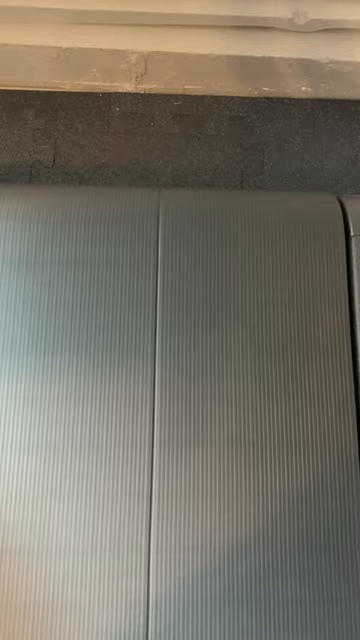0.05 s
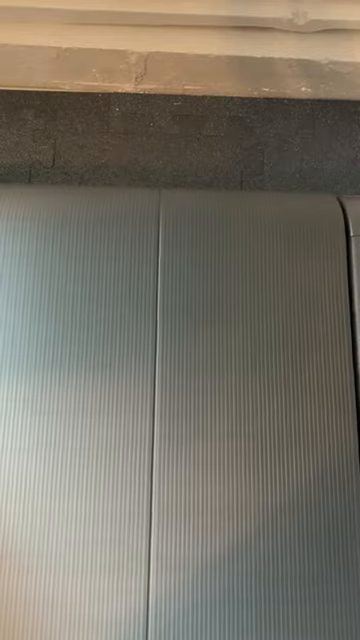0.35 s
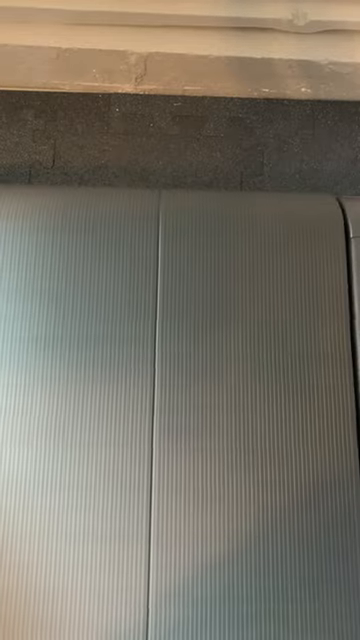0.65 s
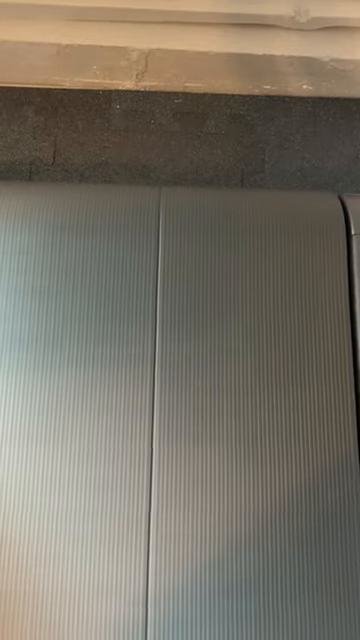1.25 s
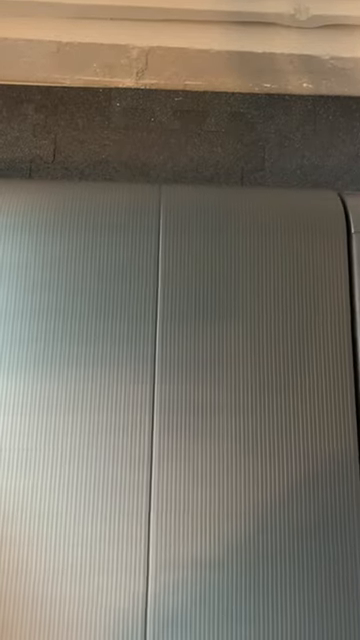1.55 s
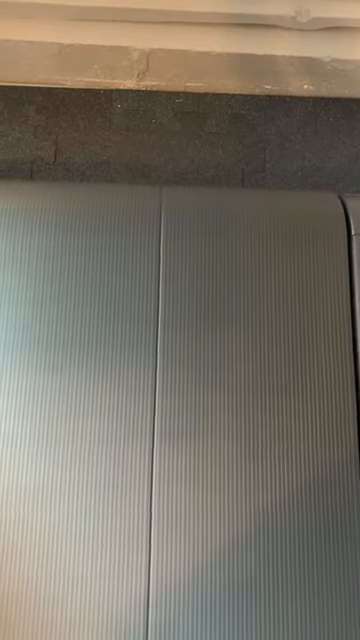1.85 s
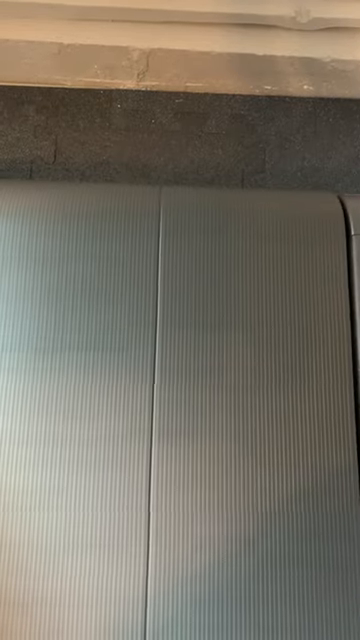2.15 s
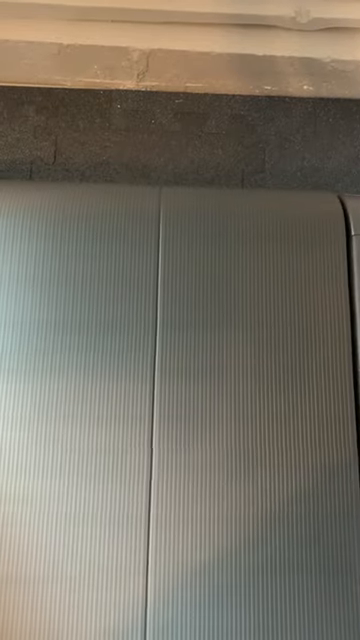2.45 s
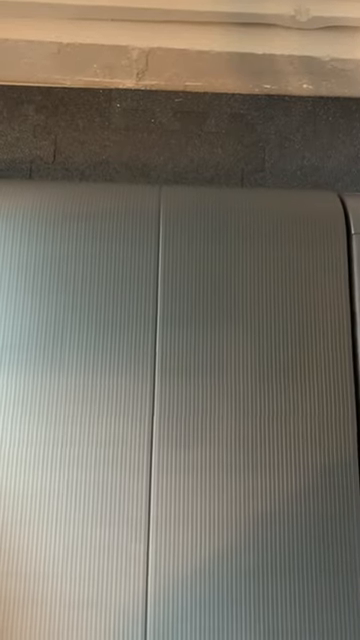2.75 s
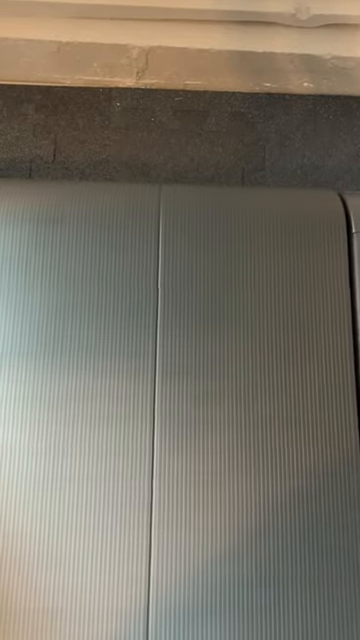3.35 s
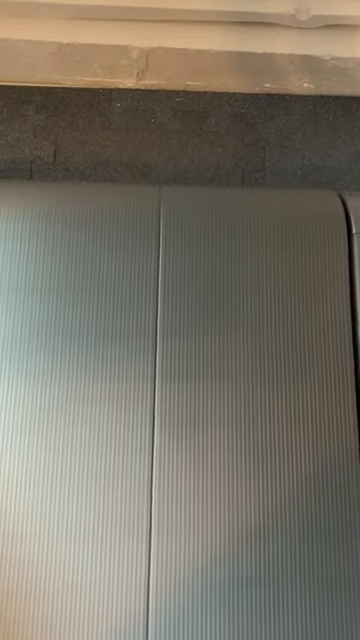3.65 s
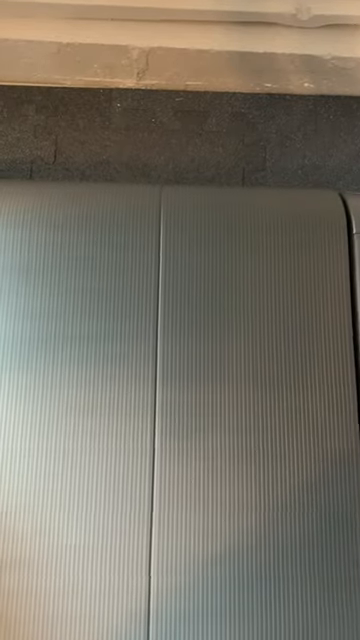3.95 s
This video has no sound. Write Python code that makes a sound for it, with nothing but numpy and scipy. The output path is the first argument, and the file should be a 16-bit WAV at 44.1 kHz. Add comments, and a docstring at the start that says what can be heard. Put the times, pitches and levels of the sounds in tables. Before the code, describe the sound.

Close up in a room, a treadmill belt rolls steadily with a hollow rumble, rubbing and faint snaps. The motor's low drone surges and ebbs, and a fast metallic ticking dips briefly on every lap.

```python
"""Empty treadmill running.

The machine runs at a steady pace, close to a pair of microphones. The motor hums and ticks once
a turn, a low drone surges and ebbs, and the drive whines thinly in short flares. The belt rumbles
over the hollow deck, swells as its seam rounds a roller, and rubs, hisses and snaps in between.
Its slack part quiets the ticking for a moment on every lap."""
import sys
import numpy as np
from scipy.fft import rfft, irfft, next_fast_len
from scipy.io import wavfile
from scipy.ndimage import map_coordinates

SR = 44100
rng = np.random.default_rng(int(sys.argv[2]) if len(sys.argv) > 2 else 0)


def pcm_store(signal):
    """Save signal as 16-bit PCM."""
    levels = np.round(np.clip(np.atleast_2d(signal), -1, 1) * 32767)
    wavfile.write(sys.argv[1], SR, levels.astype(np.int16).T)


N = 176400
T = np.arange(N) / SR


def amp(db):
    """Decibels to gain."""
    return 10 ** (np.asarray(db) / 20)


def unit(x):
    """Scale to rms 1."""
    return x / np.sqrt(np.mean(x ** 2) + 1e-20)


def along(points, hz):
    """Read (Hz, value) points on a log axis."""
    knots_hz, values = np.transpose(points)
    return np.interp(np.log(hz + 1), np.log(knots_hz + 1), values)


def lifts(modes, hz):
    """The dB that resonances add at each frequency."""
    return sum(db * np.exp(-2 * ((hz - centre) / width) ** 2) for centre, width, db in modes)


def wobble(rate_hz):
    """A smooth random curve, rate_hz knots a second."""
    return map_coordinates(rng.standard_normal(size=1024), [T * rate_hz + 2], mode="wrap")


def swell(centre_s, half_s):
    """A smooth rise and fall."""
    return np.exp(-.5 * ((T - centre_s) / half_s) ** 2)


def strike(age_s, rise_s, fall_s):
    """Envelope of a contact against the time since it began."""
    age_s = np.maximum(age_s, 0)
    return (1 - np.exp(-age_s / rise_s)) * np.exp(-age_s / fall_s)


def tone(cycles, waver_db, rate_hz):
    """A sine of rms 1 whose level wavers."""
    return unit(np.sin(2 * np.pi * (cycles + rng.random())) * amp(waver_db * wobble(rate_hz)))


def filtered(x, response):
    """x times a complex response of frequency."""
    size = next_fast_len(N + SR // 2)
    return irfft(rfft(x, size) * response(np.fft.rfftfreq(size, 1 / SR)), size)[..., :N]


# Each row: frequency in Hz, correlation between the microphones.
MIC_LIKENESS = [(100, .99), (300, .93), (550, .68), (900, .86), (1400, .86), (2300, .62), (3600, .86),
                (4700, .98), (6200, .93), (9000, .96), (13000, .96)]
def rush(colour_db):
    """Coloured stereo noise of rms 1, partly unlike at the two microphones."""
    def response(hz):
        angle = np.arccos(np.clip(along(MIC_LIKENESS, hz), -1, 1)) / 2
        return amp(colour_db(hz)) * np.array([np.cos(angle), np.sin(angle)])
    mid, side = filtered(rng.standard_normal((2, N)), response)
    return unit(np.array([mid + side, mid - side]))


MOTOR_HZ = 45.11
def shaft(zero_s=.0134, settle_s=.456, slip_turns=.44):
    """Shaft angle in turns; the motor is a little slow at first."""
    slip = slip_turns * np.clip(1 - T / settle_s, 0, 1)
    return MOTOR_HZ * (T - zero_s) + slip + .015 * wobble(rate_hz=4)


def slack_db(lap_s=1.318, first_s=.495, half_s=.125, depth_db=9.5):
    """Dip in level as the slack part of the belt passes, once a lap."""
    from_slack_s = (T - first_s + lap_s / 2) % lap_s - lap_s / 2
    return -depth_db * np.exp(-(from_slack_s / half_s) ** 4)


# Each row: centre in seconds, level in dB, half length in seconds.
WHINE_FLARES = [(0.794, -44, 0.05), (0.967, -42, 0.039), (1.05, -40, .025), (1.605, -41, 0.028),
                (1.807, -38.5, .045), (1.883, -41, 0.0098), (2.12, -37.5, 0.03), (2.31, -42.5, 0.051),
                (2.736, -44, 0.023), (3.11, -35.5, 0.043), (3.21, -49, 0.013), (3.643, -41.5, 0.046),
                (3.982, -41, 0.026)]
def whining(turns, pitch_hz=1301.5, floor_db=-49.5):
    """The drive's thin whine follows the motor's speed and flares briefly."""
    cycles = pitch_hz / MOTOR_HZ * turns + .06 * wobble(rate_hz=30)
    flares = sum(amp(db) * swell(s, half_s) for s, db, half_s in WHINE_FLARES)
    return np.hypot(amp(floor_db), flares) * tone(cycles, waver_db=1, rate_hz=30)


# Each row: frequency in Hz, level in dB.
DRIVE_TONES = [(79.5, -47), (93.2, -51), (140.2, -43.5), (145.5, -42), (220, -50), (291.2, -37.5)]
def drive(turns, drift_cycles=.05):
    """Tones of the drive and rollers, tied to the motor's speed."""
    sound = np.zeros(N)
    for hz, db in DRIVE_TONES:
        cycles = hz / MOTOR_HZ * turns + drift_cycles * wobble(rate_hz=8)
        sound += amp(db) * tone(cycles, waver_db=2.5, rate_hz=8)
    return sound


# Each row: multiple of the shaft rate, level in dB before the surge.
HUM_HARMONICS = [(1, -64), (2, -41), (3, -43.5), (5, -43), (6, -45.5), (9, -46.5), (12, -52.5)]
# Each row: time in seconds, level in dB.
DRONE_LEVELS = [(0, -26), (.1, -37.5), (.32, -32.5), (.45, -24.5), (.58, -34), (.7, -33.5), (.8, -30),
                (.93, -37.5), (1.18, -27), (1.33, -39), (1.45, -34.5), (1.65, -36.5), (1.77, -26),
                (2.0, -41), (2.12, -32), (2.35, -36), (2.47, -28), (2.64, -42), (2.9, -37), (3.17, -27),
                (3.3, -40), (3.42, -28), (3.53, -39.5), (3.76, -26.5), (3.95, -41.5)]
def motor(turns, hum_follows=.35):
    """Shaft harmonics hum, surging with a drone at four times the shaft rate."""
    drone_db = np.interp(T, *np.transpose(DRONE_LEVELS))
    drone = amp(drone_db) * tone(4 * turns + .05 * wobble(rate_hz=14), waver_db=1, rate_hz=20)
    surge = amp(hum_follows * (drone_db - drone_db.mean()))
    hum = sum(amp(db) * tone(k * turns, waver_db=1.5, rate_hz=9) for k, db in HUM_HARMONICS)
    return surge * hum + drone


# Each row: centre in seconds, level in dB, half length in seconds.
DECK_GROANS = [(.32, -39.5, .04), (.47, -39, .05), (1.27, -38, .03), (1.47, -37.5, .03), (1.74, -36.5, .06),
               (2.45, -36, .035)]
def groaning(pitch_hz=553):
    """Now and then the rubbing belt sets one narrow deck resonance groaning."""
    level = sum(amp(db) * swell(s, half_s) for s, db, half_s in DECK_GROANS)
    return level * tone(pitch_hz * T + .2 * wobble(rate_hz=35), waver_db=2, rate_hz=30)


# Each row: resonance in Hz, width in Hz, lift in dB.
STEEL_MODES = [(2700, 280, 25), (3715, 330, 30), (4150, 240, 27), (4390, 170, 22), (4710, 220, 23),
               (5460, 300, 16), (7750, 240, 17)]
def steel_db(hz):
    """Colour of the ringing steel roller."""
    return lifts(STEEL_MODES, hz)


# Each row: frequency in Hz, relative density in dB.
SLIDE_COLOUR = [(700, -1.5), (1700, 4), (2600, 1.5), (3200, 5.5), (4000, -0.5), (6200, -3), (7800, -8),
                (10500, -2.5), (11700, -16.5), (15600, -20)]
def sliding(level_db=-43, ring_share=.12):
    """The belt hisses over the deck, faintly coloured by the steel."""
    level = amp(level_db + .5 * wobble(rate_hz=20))
    return level * rush(lambda hz: along(SLIDE_COLOUR, hz) + ring_share * steel_db(hz))


# Each row: frequency in Hz, relative density in dB.
DRAG_COLOUR = [(300, -33), (700, -3), (1300, 4), (2000, -7), (3000, -18.5), (6000, -44)]
def dragging(level_db=-41.5):
    """The taut belt drags on the deck, easing as the slack passes."""
    level = amp(level_db + slack_db() + 1.4 * wobble(rate_hz=18))
    return level * rush(lambda hz: along(DRAG_COLOUR, hz))


# Each row: start in seconds, relative level in dB.
BELT_SNAPS = [(0.7667, -27), (0.7876, -28), (1.0575, -24.5), (1.077, -22), (1.121, -27), (1.3668, -30),
              (1.387, -30), (1.4104, -30), (1.587, -27.5), (2.0534, -31), (2.125, -32), (2.366, -28),
              (2.387, -27.5), (2.429, -25), (2.584, -28), (2.675, -33), (2.7177, -30), (3.273, -28.5),
              (3.3628, -28), (3.426, -32), (3.5593, -30), (3.5828, -32), (3.694, -27), (3.715, -29.5),
              (3.782, -29.5), (3.848, -35), (3.897, -32), (3.9814, -31)]
# Each row: frequency in Hz, relative density in dB.
SNAP_COLOUR = [(600, -59), (1400, -20), (3000, 3.5), (6200, 7), (10300, 0), (12000, -12), (15600, -53)]
def snapping(gain_db=-4, ring_share=.22):
    """The belt catches and lets go with a bright snap that also rings the steel."""
    level = sum(amp(db + gain_db) * strike(T - s, rise_s=.003, fall_s=.0075) for s, db in BELT_SNAPS)
    return level * rush(lambda hz: along(SNAP_COLOUR, hz) + ring_share * steel_db(hz))


# Each row: frequency in Hz, relative density in dB.
TICK_COLOUR = [(500, 0), (1300, -1), (2500, 0), (3200, 13), (3900, -2), (6300, 15.5), (10500, 2.5),
               (11700, -7), (15600, -41)]
def ticking(turns, scrape_db=-39.5, ring_db=-30.5, rebound_db=-6.5, scatter_db=1.3, jitter_turns=.05):
    """A scraping tick and its rebound ring the steel every turn, fading as the slack passes."""
    loose_turns = turns + jitter_turns * wobble(rate_hz=40)

    def contacts(lag_turns):
        count, part = np.divmod(loose_turns - lag_turns + 2, 1)
        sizes = amp(scatter_db * rng.standard_normal(size=256))
        return sizes[count.astype(int)] * strike(part / MOTOR_HZ, rise_s=.0028, fall_s=.005)

    def ticks(colour_db):
        level = contacts(lag_turns=0) + amp(rebound_db) * contacts(lag_turns=.39)
        return level * rush(colour_db)

    scrape = amp(scrape_db) * ticks(lambda hz: along(TICK_COLOUR, hz))
    ring = amp(ring_db) * ticks(steel_db)
    return amp(slack_db()) * (scrape + ring)


# Each row: frequency in Hz, relative density in dB.
ROLL_COLOUR = [(22, -31), (33, -26), (43, 3.5), (110, -5), (250, -2.5), (480, 3), (800, -2), (1250, -4),
               (1450, -10.5), (2300, -18.5), (4000, -42), (9000, -93)]
# Each row: resonance in Hz, width in Hz, lift in dB.
DECK_MODES = [(80, 7.4, 9), (97, 13, -1), (129, 41, 8.5), (169, 19.4, 17.5), (220, 22.4, 11), (264, 7.8, 7),
              (302, 57, 10), (350.8, 16, 8), (401.8, 9.7, 9), (547.5, 29, 5.5), (644.5, 10, 3.5),
              (858.5, 12.5, 6.5), (1274, 55, 3.5), (1655, 32, 7.5), (2194, 63, 11)]
def deck_db(hz):
    """Colour of the rolling belt through the resonant deck and frame."""
    return along(ROLL_COLOUR, hz) + lifts(DECK_MODES, hz)


def rolling(level_db=-29.5):
    """The belt rumbles steadily over the hollow deck."""
    return amp(level_db + wobble(rate_hz=14)) * rush(deck_db)


# Each row: centre in seconds, level in dB.
BELT_RUBS = [(.825, -33.5), (1.28, -41), (1.47, -35), (2.13, -36), (2.7, -41), (3.42, -36)]
# Each row: frequency in Hz, dB added to the deck's colour.
RUB_COLOUR = [(80, -4), (170, -13), (300, 2), (520, 3), (900, -8.5), (2500, -8)]
def rubbing(half_s=.036):
    """The belt rubs on the deck between passes of the seam."""
    level = sum(amp(db) * swell(s, half_s) for s, db in BELT_RUBS)
    return level * rush(lambda hz: deck_db(hz) + along(RUB_COLOUR, hz))


# Each row: centre in seconds, rumble in dB, scuff in dB, boom in dB, half length in seconds.
SEAM_PASSES = [(.46, -29, -50, -44, .048), (1.12, -29, -32, -36, .055), (1.76, -30.5, -50, -44, .055),
               (2.435, -25.5, -29, -30.5, .05), (3.08, -31, -40, -37, .07), (3.74, -29, -32, -36, .055)]
# Each row: frequency in Hz, dB added to the deck's colour.
SEAM_COLOUR = [(40, 2), (90, -4), (160, -6.5), (280, 4), (500, 5), (750, -5.5), (1200, -15), (2500, -16)]
# Each row: frequency in Hz, relative density in dB.
SCUFF_COLOUR = [(200, -3), (400, 3.5), (900, 4), (1300, 1), (2200, -13), (3500, -19), (8000, -53)]
def seam(boom_hz=145.8):
    """Twice a lap the seam rounds a roller: it rumbles, scuffs and makes the deck boom."""
    centres_s, rumble_db, scuff_db, boom_db, halves_s = np.transpose(SEAM_PASSES)
    passes = np.array([swell(s, half_s) for s, half_s in zip(centres_s, halves_s)])
    rumble = amp(rumble_db) @ passes * rush(lambda hz: deck_db(hz) + along(SEAM_COLOUR, hz))
    scuff = amp(scuff_db) @ passes * rush(lambda hz: along(SCUFF_COLOUR, hz))
    boom_cycles = boom_hz * T + .2 * wobble(rate_hz=28)
    boom = amp(boom_db) @ passes * tone(boom_cycles, waver_db=2, rate_hz=25)
    return rumble + scuff + boom


# Each row: frequency in Hz, left minus right in dB.
MIC_BALANCE = [(50, -1), (170, -2.5), (370, -1.5), (480, -4.5), (650, -6.5), (900, -2), (1300, -1),
               (2200, -2.5), (3000, -0.5), (12000, 0)]
# Each row: frequency in Hz, lead of the left side in radians.
MIC_LEAD = [(1300, .05), (2200, .8), (2600, 2.1), (3400, 1.5), (4700, 3.1), (6800, 6.3), (8900, 9.4),
            (11100, 12.6), (15300, 18.8)]
def microphones(hz):
    """Gain and phase at the left and right microphones."""
    sides = np.array([[.5], [-.5]])
    return amp(sides * along(MIC_BALANCE, hz)) * np.exp(1j * sides * along(MIC_LEAD, hz))


def scene():
    """The machine as it reaches the two microphones."""
    turns = shaft()
    tones = motor(turns) + drive(turns) + whining(turns)
    belt = rolling() + seam() + rubbing() + sliding() + dragging() + groaning()
    return filtered(tones + belt + ticking(turns) + snapping(), microphones)


def record(dry):
    """Cut everything above the band limit."""
    top_hz = 15800
    return filtered(dry, lambda hz: hz < top_hz)


dry = scene()
out = record(dry)
pcm_store(out)
```